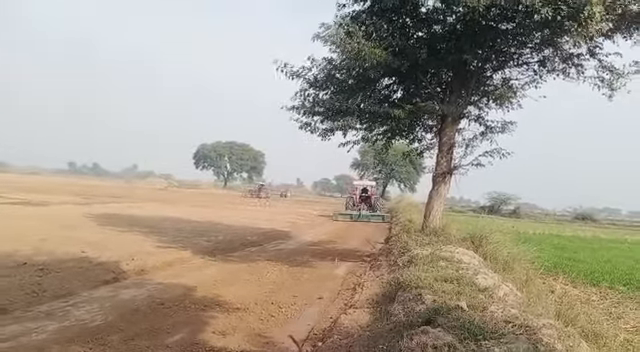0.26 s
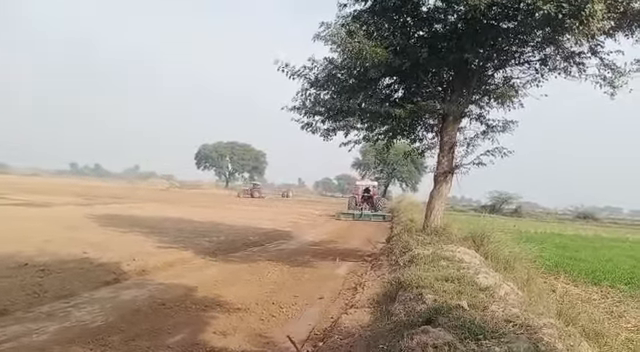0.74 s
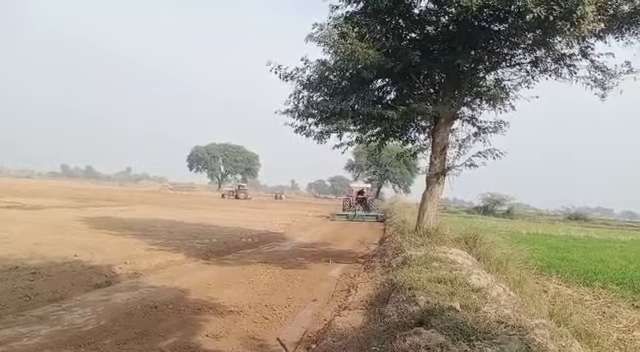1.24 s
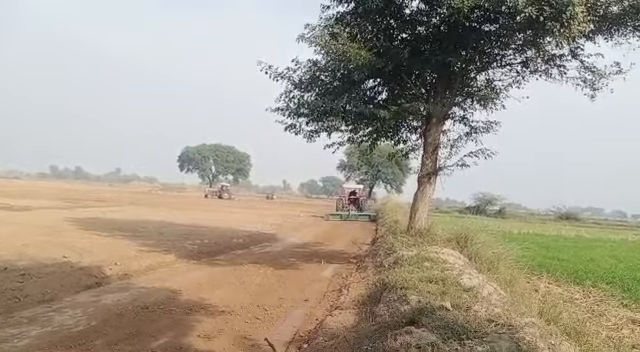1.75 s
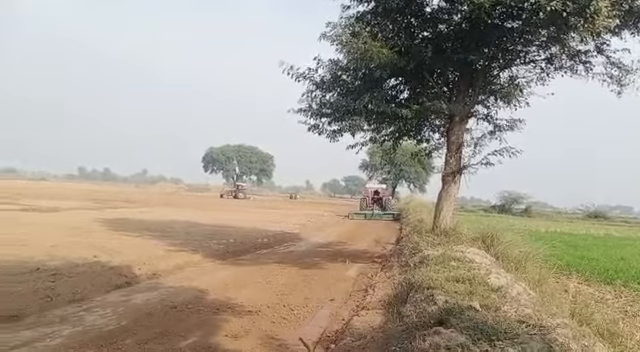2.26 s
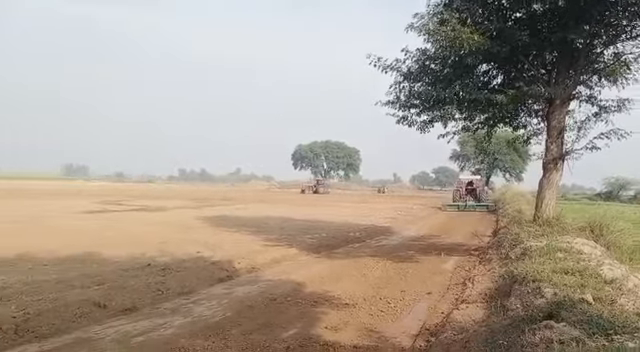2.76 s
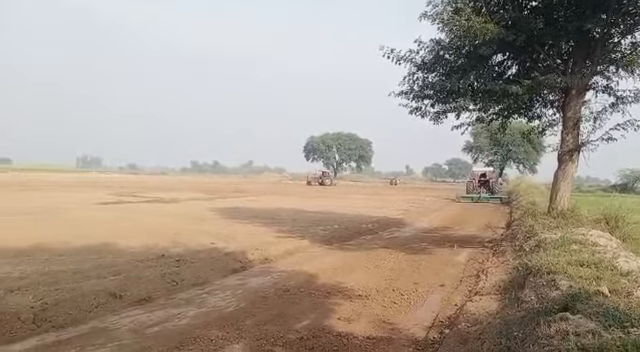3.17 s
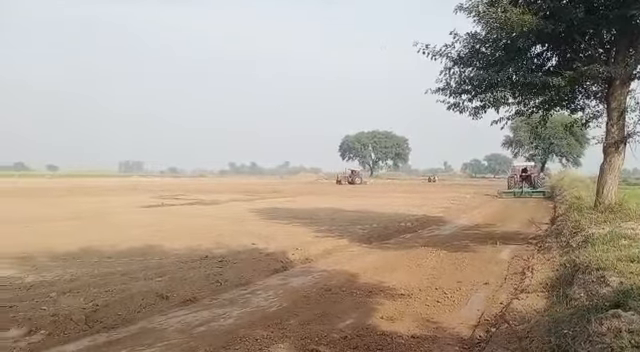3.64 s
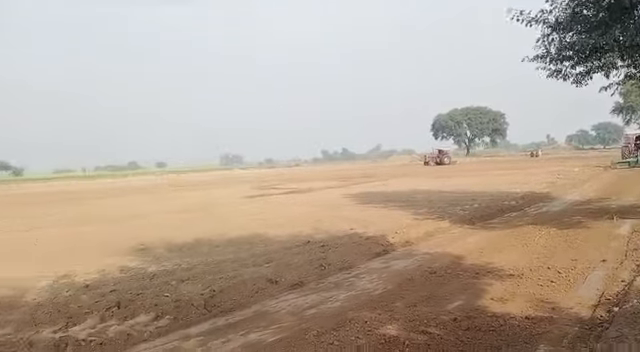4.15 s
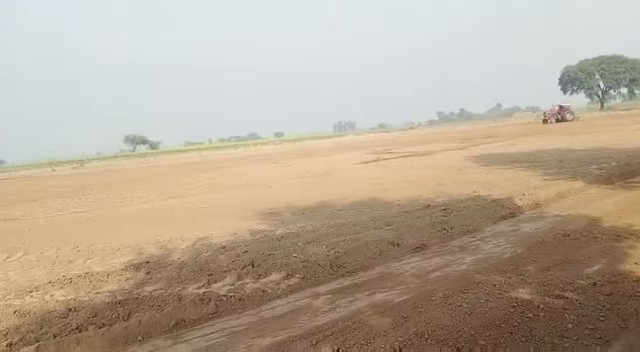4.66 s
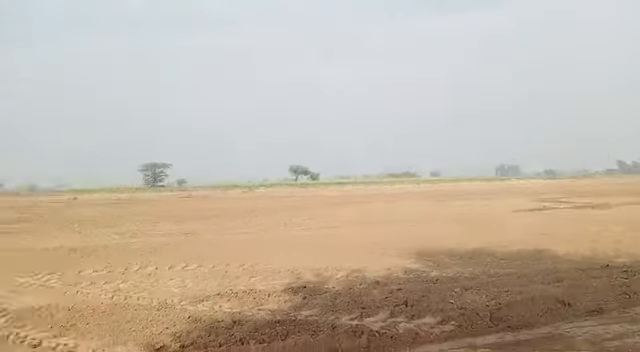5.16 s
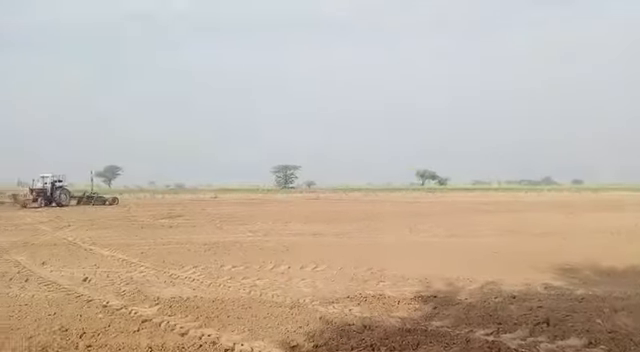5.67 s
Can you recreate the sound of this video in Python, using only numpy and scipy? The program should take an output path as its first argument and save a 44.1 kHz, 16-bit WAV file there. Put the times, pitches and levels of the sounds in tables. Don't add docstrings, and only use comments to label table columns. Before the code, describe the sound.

Open farmland, heard on a handheld phone with no room echo. From 0 to 0.6 s, hard low wind thumps and a brief tearing flutter overload the foreground. Beneath runs a distant diesel tractor, a rough noisy clatter pulsing about fifty times a second, rising slightly in pitch until about 2.2 s. Wind is lighter from 0.7 to 2.6 s, with several harder engine knocks at 1.2-1.9 s and a very faint high jingle. From 2.4 to 3.7 s the engine slows to just above forty pulses a second, becoming duller and phasey as the phone swings away; chains jingle faintly around 3 s and a few tiny link pings follow until 4.4 s. Gusts thump at 3.3-4.1 s. The clatter then fades gradually, especially after 5 s. A thin distant gear whine wavers weakly. Near 5.7 s one last gust bumps the microphone amid faint bird whistles.

```python
import sys
import numpy as np
from scipy import signal
from scipy.fft import rfft, irfft
from scipy.io import wavfile
from scipy.ndimage import uniform_filter1d

SR = 44100
rng = np.random.default_rng(int(sys.argv[2]) if len(sys.argv) > 2 else 0)


def unload_audio(sound):
    columns = np.transpose(np.atleast_2d(sound))
    steps = np.round(np.clip(columns, -1, 1) * 32767)
    wavfile.write(sys.argv[1], SR, steps.astype(np.int16))


def boost(x):
    u = np.asarray(x, float) / 20
    return 10 ** u


N = 260631


def rms_one(x):
    return x / np.sqrt(np.mean(x ** 2) + 1e-20)


def in_time(rows):
    times, *columns = np.transpose(rows)
    return [np.interp(np.arange(N) / SR, times, column) for column in columns]


def at_hz(points, hz):
    point_hz, point_db = np.transpose(points)
    return np.interp(np.log(hz), np.log(point_hz), point_db)


def band(x, low_hz, high_hz, order=2):
    return signal.sosfilt(signal.butter(order, [low_hz, high_hz], "band", fs=SR, output="sos"), x)


def swell(start, length, rise, fall):
    t = np.arange(N) / SR - start
    before = np.minimum(t, 0) / rise
    after = np.maximum(t - length, 0) / fall
    return np.exp(-before ** 2 - after ** 2)


def swells_db(rows, rise, fall, floor_db):
    power = boost(floor_db) ** 2
    for start, length, db in rows:
        power = power + (boost(db) * swell(start, length, rise, fall)) ** 2
    return 10 * np.log10(power)


def drift(rate_hz):
    pole = np.exp(-80 * np.pi * rate_hz / SR)
    chance = rng.standard_normal(N // 40 + 2002)
    slow = signal.lfilter([1], [1, -2 * pole, pole * pole], chance)[2000:]
    return np.interp(np.arange(N) / 40, np.arange(len(slow)), rms_one(slow))


def shimmer(shape, bins, frames):
    blur = uniform_filter1d(rng.standard_normal(shape), size=bins, axis=0)
    blur = uniform_filter1d(blur, size=frames, axis=1)
    return rms_one(uniform_filter1d(blur, size=frames, axis=1))


def firings(uneven_db):
    # t/s, firing rate f/Hz
    speed = [(0.0, 51.51), (0.4, 52.86), (1.2, 53.17), (2.15, 54.47), (2.4, 52.12), (2.9, 49.71),
             (3.15, 45.37), (3.55, 43.82), (3.7, 41.3), (3.9, 43.12), (4.5, 42.54), (4.75, 41.19),
             (5.1, 43.16), (5.91, 41.23)]
    cylinder_db = [2.5, -.6, -1.5, .4]
    turns = 1.47 + np.cumsum(in_time(speed)[0]) / SR
    count = np.round(turns).astype(int)
    strength_db = np.array(cylinder_db)[count % 4] + uneven_db * rng.standard_normal(400)[count]
    return turns, boost(strength_db)


def burst(turns, strength, lead, sharp, steady):
    pulse = np.exp(sharp * (np.cos(2 * np.pi * (turns + lead)) - 1))
    return np.sqrt(steady + strength ** 2 * pulse)


def clatter(turns, strength):
    gate = burst(turns, strength, lead=.06, sharp=2.4, steady=.78)
    grit = rms_one(gate * rng.standard_normal(N))
    blows = grit + boost(-17.5) * knocks(turns, strength)
    hz, s, frames = signal.stft(rms_one(blows), SR, nperseg=1024, noverlap=768)
    cepstrum = irfft(np.log(boost(path_db(np.maximum(hz, 20), s))), axis=0)
    cepstrum[1:512] *= 2
    cepstrum[513:] = 0
    response = np.exp(rfft(cepstrum, axis=0))
    return signal.istft(frames * response, SR, nperseg=1024, noverlap=768)[1][:N]


def knocks(turns, strength):
    # t/s, peak level/dB
    hard_knocks = [(1.2182, -26), (1.3174, -26.5), (1.3354, -20.5), (1.481, -28), (1.5224, -22.5),
                   (1.7798, -24), (1.8532, -25.5), (2.8668, -30), (4.4728, -28), (4.569, -28),
                   (4.6633, -30.5)]
    clicks, count = np.zeros(N), np.arange(2, int(turns[-1]))
    # lag and spread in firings, level/dB
    for lag, spread, db in ((-.08, 0.044, -3.5), (.03, .06, -10), (.3, .1, 1.5), (.6, 0.09, -4.5)):
        moment = count + lag + spread * rng.standard_normal(400)[count]
        at = np.searchsorted(turns, moment).clip(0, N - 1)
        height = boost(db + 1.1 * rng.standard_normal(400)[count]) * strength[at]
        clicks[at] += height * rng.choice([-1, 1], 400)[count]
    for s, db in hard_knocks:
        clicks[round(s * SR)] += boost(db + 35.5)
    return rms_one(band(clicks, 1700, 3300, order=1))


def path_db(hz, s):
    # t/s, share turned away (0-1)
    heading = [
        (0, 0.14),
        (2.1, 0.14),
        (2.6, 0.23),
        (3.15, 0.88),
        (3.6, 0.58),
        (4.1, 0.82),
        (4.7, 0.94),
        (5.91, 1),
    ]
    # f/Hz, level/dB per Hz
    facing = [(240, -54), (400, -36), (533, -35.5), (878, -22), (1130, -25.5), (1360, -3.5), (2300, -5),
              (2630, -2), (3100, -14), (3470, 0.5), (6720, -11), (7900, -37), (10300, -81.5), (17400, -120)]
    # f/Hz, level/dB per Hz
    away = [(240, -43.5), (400, -23), (589, -23), (627, -23), (912, -28), (1200, -12), (1430, -8),
            (1860, -5), (2350, -3.5), (3880, -5), (6720, -6), (7900, -21.5), (10300, -67), (17400, -120)]
    zones_hz = [1150, 2000, 3200, 5200]
    turned = np.clip(np.interp(s, *np.transpose(heading)), 0, 1)
    db = np.outer(at_hz(facing, hz), 1 - turned) + np.outer(at_hz(away, hz), turned)
    db += fringes_db(hz, s)
    streak_share = np.interp(hz, [900, 1300, 5000, 5600], [.5, 1, 1, .6])
    db += np.outer(streak_share, 2.8 + 2 * turned) * shimmer(db.shape, bins=3, frames=12)
    ragged_db = 1.0 + np.interp(hz, (6800, 7600), [0, 3])
    db += ragged_db[:, None] * shimmer(db.shape, bins=8, frames=3)
    far_db = -63.5
    zone, lift = np.searchsorted(zones_hz, hz), np.zeros(db.shape)
    for k, wanted_db in enumerate([far_db, *zone_levels_db(s, turned)]):
        power = uniform_filter1d(np.sum(boost(db[zone == k]) ** 2, axis=0), size=20) / len(hz)
        lift[zone == k] = wanted_db - 10 * np.log10(power)
    return db + uniform_filter1d(lift, size=3, axis=0)


def fringes_db(hz, s):
    # start t/s, end t/s, start f/Hz, end f/Hz, level/dB
    fine_fringes = [(0, 2.65, 2620, 2680, 4), (-3.5, 1.26, 3100, 3530, 10), (3.5, 2.4, 1870, 2400, 5),
                    (2.3, 3.3, 4930, 4340, -7), (3, 4, 3710, 3660, 6), (1.5, 3.8, 4500, 5000, -5.5),
                    (4, 5.34, 1655, 1380, 8.5), (3.5, 5.48, 2570, 2130, 4), (4.5, 12.5, 2690, 2160, 14),
                    (4.05, 4.5, 1280, 1060, 14), (4.5, 5.43, 1880, 1780, -9.5), (5, 5.63, 3120, 2880, 11),
                    (5.5, 8.3, 1850, 1300, 6.5), (-0.5, 8.1, 3700, 3400, -10)]
    # start t/s, end t/s, start f/Hz, end f/Hz, level/dB
    broad_fringes = [(2, 2.34, 5900, 7270, 9.5), (2, 4.7, 3660, 3080, 9.5), (3, 6.3, 1075, 743, 12.5),
                     (3, 4.5, 7950, 8300, 9), (5.5, 6.5, 1700, 2500, -1), (4, 5, 3550, 2860, -8.5),
                     (3.5, 4.75, 4900, 4970, -9), (4.5, 5.6, 4300, 3300, -7.5), (5.5, 6.5, 3200, 2900, -10),
                     (2.5, 2.9, 7500, 6300, -6), (5.5, 5.2, 8500, 8300, 6), (4.5, 5.42, 3010, 2620, -20.5),
                     (5, 5.5, 4400, 4430, 9), (3.5, 7.8, 10500, 6400, -13), (4.5, 7.5, 770, 1100, 3),
                     (3.5, 4, 1750, 1840, 5), (3, 4.76, 1300, 1230, -5), (7, 5.5, 1500, 1500, 4)]
    db = np.zeros((len(hz), len(s)))
    for rows, share in ((fine_fringes, 0.045), (broad_fringes, 0.072)):
        for start, end, from_hz, to_hz, depth_db in rows:
            along = np.clip((s - start) / (end - start), 0, 1)
            centre = from_hz + (to_hz - from_hz) * along
            shape = np.exp(-((hz[:, None] - centre) / (share * centre)) ** 2 / 2)
            db += depth_db * np.sin(np.pi * along) ** .5 * shape
    return db


def zone_levels_db(s, turned):
    # t/s, level/dB, brightness/dB
    engine = [(0, -37, -2), (.3, -38.5, -0.5), (.6, -38, -2.5), (.9, -37, 1), (1.2, -37, 0), (1.5, -39, 2),
              (2.07, -38.5, 4), (2.36, -41, 1), (2.7, -43, -1), (3.25, -43.5, -4), (3.55, -40.5, -3),
              (3.84, -43, -1.5), (4.3, -41, 0), (4.73, -39, 0), (5.05, -41.5, 1), (5.32, -43, 1.5),
              (5.609, -46.5, 3.5), (5.91, -47, 3)]
    zone_facing_db = [-5, 0.5, -5, -9]
    zone_turned_db = [-3.5, 0, -7, -5.5]
    zone_brightens = [-0.13, -0.17, 0.013, 1.08]
    # t/s, length/s, level/dB
    hand_shadow = [
        (3.773, 1.05, -7),
    ]
    times, level_db, bright_db = np.transpose(engine)
    levels = np.interp(s, times, level_db) + np.outer(zone_brightens, np.interp(s, times, bright_db))
    levels += np.outer(zone_facing_db, 1 - turned) + np.outer(zone_turned_db, turned)
    for start, length, shade_db in hand_shadow:
        shade = swell(start, length, rise=0.11, fall=0.11)
        levels[2] += shade_db * np.interp(s * SR, np.arange(N), shade)
    return levels


def wind(lumpy_db):
    # t/s, length/s, rumble level/dB, flutter against rumble level/dB
    gusts = [(0, 0.078, -29.5, -3), (0.061, 0.046, -27, -6), (0.147, 0.084, -31, 3),
             (0.263, 0.086, -31.5, -1), (0.334, .04, -43.5, 12.5), (0.437, .19, -35, 2.5),
             (.75, .2, -46.5, 5), (1.176, .04, -49.5, -1), (1.258, 0.047, -44, -2.5), (1.38, 0.043, -53, 9),
             (1.55, .35, -48, 4.5), (2.069, 0.14, -44, 1.5), (2.295, 0.041, -46.5, 5),
             (2.424, 0.18, -46.5, 8.5), (2.687, .13, -41, 4), (2.862, 0.085, -39, 3),
             (3.076, 0.036, -45, 6), (3.334, 0.14, -29.5, -13.5), (3.473, 0.12, -28, -4),
             (3.64, 0.16, -34.5, -10), (3.765, .09, -37, -7.5), (3.956, 0.052, -37, -5),
             (4.045, 0.12, -38.5, -0.5), (4.195, 0.084, -51.5, 10), (4.461, .12, -50, -14),
             (4.713, 0.039, -43, -12), (4.86, 0.19, -43.5, -3), (5.116, 0.24, -47.5, 0.5),
             (5.383, 0.059, -50.5, 0.5), (5.654, 0.088, -34.5, -9.5)]
    # t/s, length/s, level/dB
    tears = [
        (0, 0.1, -55),
        (0.191, 0.048, -33.5),
        (0.245, 0.031, -44.5),
        (.31, 0.071, -58.5),
        (3.52, .03, -53),
        (5.68, 0.04, -60),
    ]
    # t/s, peak level/dB, f/Hz, length/cycles
    eddies = [(0.017, -12.5, 116.6, 1.4), (0.091, -11, 100, 1.2), (0.194, -10, 196, 2.7),
              (0.217, -15.5, 139, 2.2), (0.348, -11.5, 149, 1.6), (0.434, -19.5, 110, 2.3),
              (0.499, -16.5, 157, 2.4), (0.598, -32, 77, 1.3), (0.841, -27, 123, 2.1),
              (1.187, -34, 172.4, 2.5), (1.278, -36, 153, 1.2), (1.593, -28.5, 202, 4.1),
              (1.719, -33, 159, 2.5), (1.796, -32, 219.7, 2.7), (2.711, -24, 154, 1.45),
              (2.772, -22, 128, 3.8), (2.901, -33, 125, 1.25), (3.098, -31.5, 85.3, 1.1),
              (3.356, -15, 121, 2.6), (3.48, -24, 174, 3.6), (3.511, -14, 149, 1.3), (3.531, -28, 92, 1.4),
              (3.522, -27.5, 290, 3), (3.984, -12.5, 131.6, 1.06), (4.481, -34.5, 75.4, 1.75),
              (4.56, -34.5, 79.6, 2), (4.874, -36, 82.5, 1.6), (5.425, -33.5, 83.4, 2.2),
              (5.685, -26.5, 66, 1.55), (5.739, -14.5, 104, 0.68)]
    rumbles = [(s, length, db) for s, length, db, _ in gusts]
    flutters = [(s, length, db + tilt_db) for s, length, db, tilt_db in gusts]
    ranges = (rumbles, 67.1, 130.8, -52), (flutters, 148.7, 248.3, -52), (tears, 274, 468.5, -66.5)
    out, shared = np.zeros(N), drift(7.5)
    for rows, low_hz, high_hz, lull_db in ranges:
        level_db = swells_db(rows, rise=0.0083, fall=0.025, floor_db=lull_db)
        lumps = boost(lumpy_db * (shared + 0.65 * drift(26)))
        noise = band(rng.standard_normal(N), low_hz, high_hz, order=4)
        even = noise / np.sqrt(uniform_filter1d(noise ** 2, size=SR // 25))
        out += boost(level_db - 2.5) * rms_one(lumps * even)
        if rows is rumbles:
            rumble_db = level_db
    for s, db, hz, cycles in eddies:
        t = np.arange(int(4 * SR / hz)) / SR * hz
        envelope = t ** 2 * np.exp(2 - 2 * t) * np.exp(-(t / np.maximum(cycles, .5)) ** 2 / 2)
        packet = np.sin(2 * np.pi * t) * envelope
        out[round(s * SR):][:len(t)] += boost(db - 1.5) * packet[:N - round(s * SR)]
    deep = rms_one(band(rng.standard_normal(N), 27, 77))
    return out + boost(-64) * deep * boost(rumble_db + 48)


def chains(turns, strength):
    # t/s, length/s, level/dB
    shakes = [
        (.22, .05, -79),
        (.9, .2, -80),
        (1.26, 0.093, -85),
        (2.78, .14, -77),
        (3.02, .2, -67),
        (3.38, .08, -82.5),
        (3.62, .18, -75.5),
        (4.1, 0.22, -75),
        (4.55, .35, -86.5),
    ]
    # t/s, length/s, level/dB
    glint = [
        (.92, .55, -86.5),
        (1.8, .45, -94),
    ]
    # t/s, length/s, level/dB
    haze = [
        (2.55, 1.9, -87),
    ]
    # t/s, peak level/dB, f/Hz
    pings = [
        (3.679, -71, 10900),
        (3.7449, -70, 10100),
        (3.9624, -74, 10800),
        (4.2577, -65, 9710),
        (4.4293, -73, 10500),
    ]
    hum_db = -87
    rest_db = hum_db - 8.5 * swell(4.9, N / SR, .1, .1)
    top_db = swells_db(shakes, rise=.05, fall=.05, floor_db=rest_db)
    lower_db = -90.5 + 0.37 * (top_db - hum_db)
    steady = np.clip(boost(-95.5 - top_db), .01, 3)
    loose = burst(turns, strength ** 2, lead=0.14, sharp=4.5, steady=steady)
    even = loose / np.sqrt(uniform_filter1d(loose ** 2, size=SR // 8))
    shake = even * rng.standard_normal((2, N))
    out = boost(top_db) * rms_one(band(shake[0], 14500, 15900, order=3))
    out += boost(lower_db) * rms_one(band(shake[1], 9860, 16000, order=4))
    out += boost(swells_db(glint, .08, .08, -110)) * rms_one(band(shake[1], 13000, 14100, order=1))
    out += boost(swells_db(haze, .1, .1, -115)) * rms_one(band(shake[0], 9000, 11200))
    t = np.arange(int(0.04 * SR)) / SR
    for s, db, hz in pings:
        out[round(s * SR):][:len(t)] += boost(db) * np.sin(2 * np.pi * hz * t) * np.hanning(len(t)) ** 1.3
    return out


def whine():
    # t/s, level/dB
    whine_levels = [
        (0, -71.5),
        (1.0, -75.5),
        (2.4, -79.5),
        (3.0, -79),
        (3.9, -70),
        (4.1, -80.5),
        (5.91, -83.5),
    ]
    hz = 641
    return boost(in_time(whine_levels)[0]) * rms_one(band(rng.standard_normal(N), hz - 6, hz + 6))


def bird():
    # t/s, length/s, f/Hz, level/dB
    chirps = [
        (5.52, .09, 790, -58),
        (5.6, .07, 350, -52),
        (5.79, .06, 1270, -54),
        (3.07, .04, 680, -62),
    ]
    out = np.zeros(N)
    for s, length, hz, db in chirps:
        t = np.arange(int(length * SR)) / SR
        out[round(s * SR):][:len(t)] += boost(db) * np.sin(2 * np.pi * hz * t) * np.hanning(len(t))
    return out


def scene():
    turns, strength = firings(uneven_db=1.0)
    tractor = clatter(turns, strength) + chains(turns, strength)
    return (tractor + whine() + bird() + wind(lumpy_db=2.0))[None]


def band_limit(x):
    return signal.sosfilt(signal.butter(12, 15830, fs=SR, output="sos"), x)


def record(dry):
    mix = signal.sosfilt(signal.butter(3, 43.4, "high", fs=SR, output="sos"), dry)
    return band_limit(mix)


dry = scene()
out = record(dry)
unload_audio(out)
```